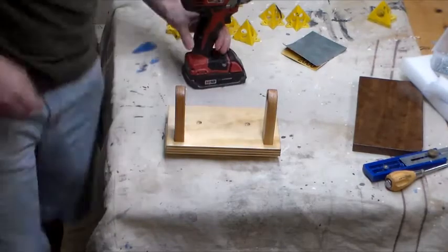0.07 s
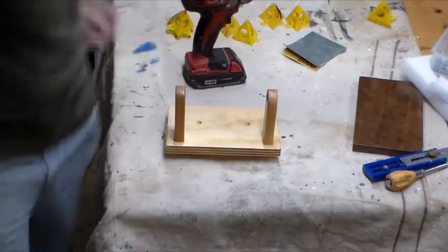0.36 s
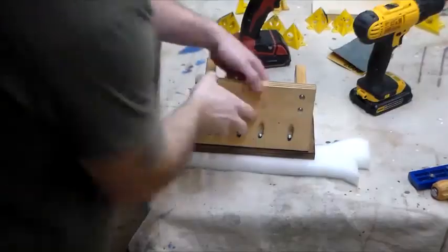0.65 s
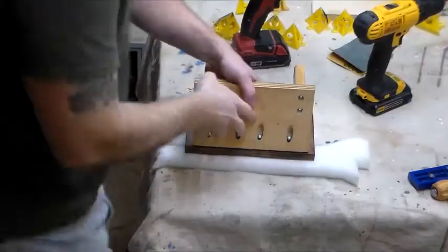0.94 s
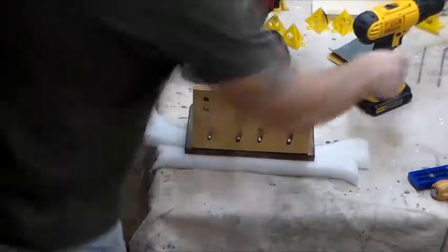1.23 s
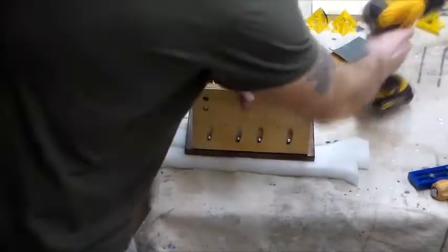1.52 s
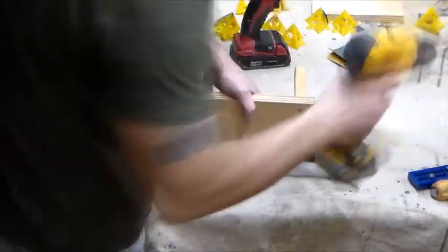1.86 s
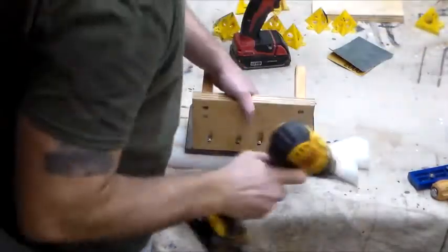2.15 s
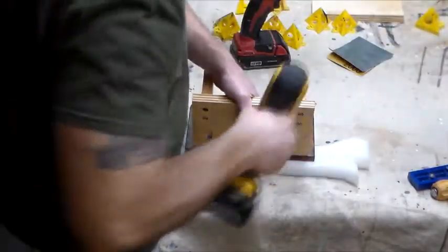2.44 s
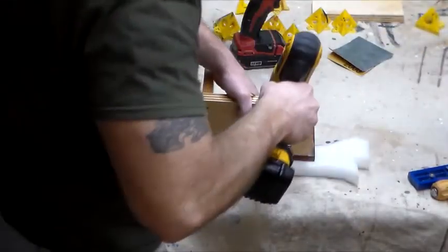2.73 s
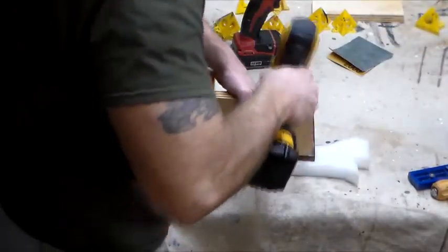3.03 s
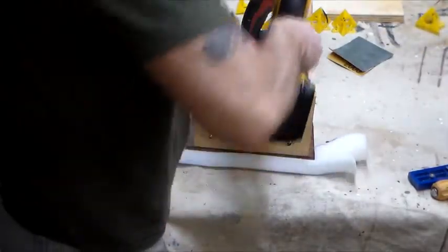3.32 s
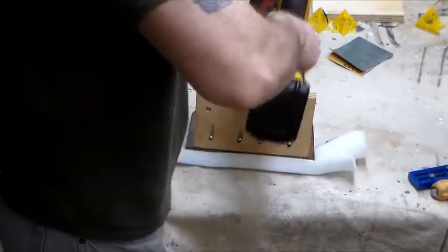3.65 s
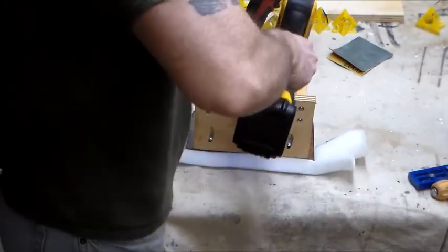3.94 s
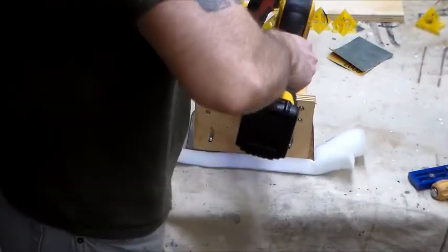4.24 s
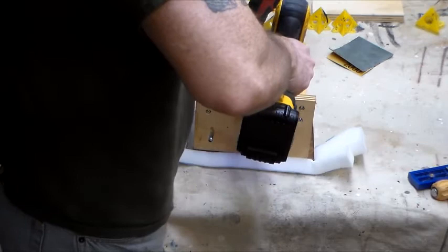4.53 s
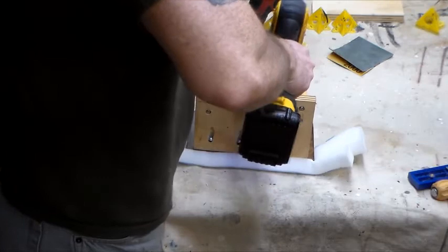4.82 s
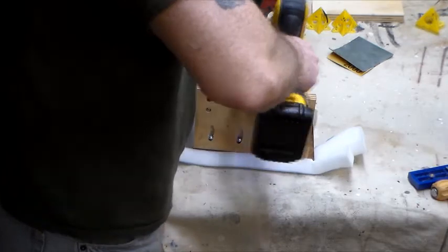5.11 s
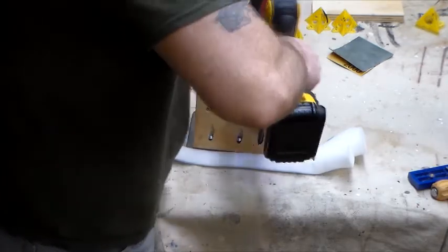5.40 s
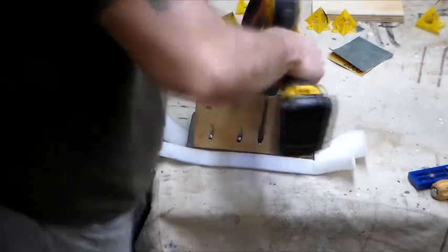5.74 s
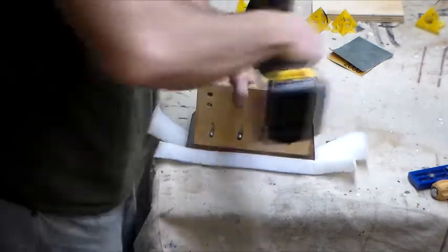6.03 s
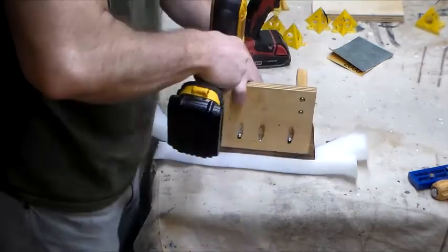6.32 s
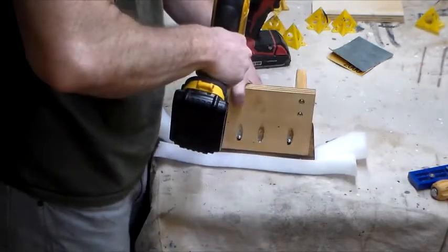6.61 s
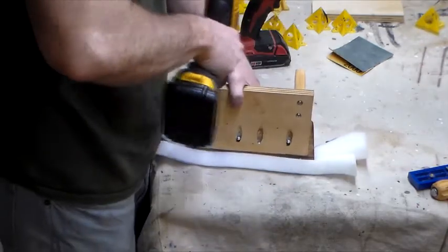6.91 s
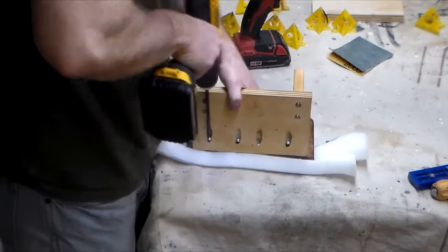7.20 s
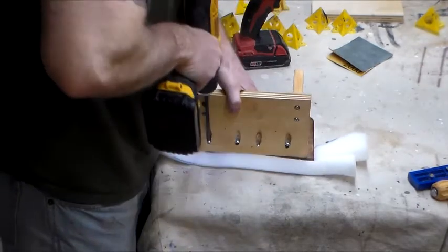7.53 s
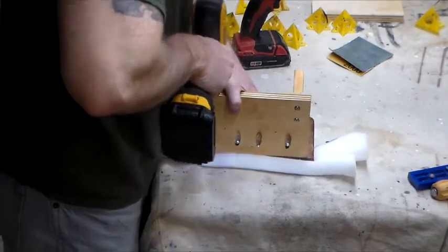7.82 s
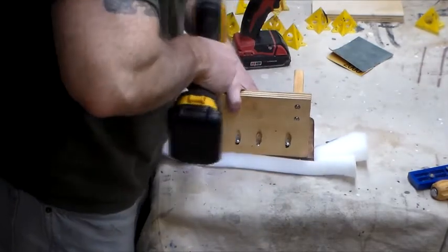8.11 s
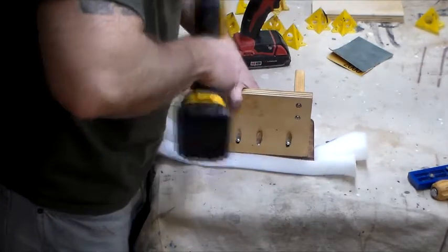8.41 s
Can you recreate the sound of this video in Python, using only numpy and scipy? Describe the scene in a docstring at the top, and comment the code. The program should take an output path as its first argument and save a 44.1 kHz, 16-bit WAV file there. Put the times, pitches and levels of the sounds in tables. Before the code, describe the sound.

A cordless drill drives screws into wood in short growling bursts, after a few thumps and clicks on a workbench.

```python
"""A low room rumble is heard first, with wood sliding and thumping on a cloth-covered workshop bench.
A nearby camera's lens ticks and whirs faintly, and a steel bit is seated in a screw with a few clacks.
A cordless drill then drives screws into a wooden jig in ten short trigger pulls: gears and friction
force the housing and jig to growl and grind, the chuck rattles, fan and brushes hiss, and the screw
squeals by stick-slip. The small room adds a short reverberation."""
import sys
import numpy as np
from scipy import signal
from scipy.fft import rfft, irfft
from scipy.io import wavfile
from scipy.ndimage import uniform_filter1d

SR = 44100
rng = np.random.default_rng(int(sys.argv[2]) if len(sys.argv) > 2 else 0)


def int16_out(signal):
    """Quantize to a 16-bit WAV file."""
    q = np.round(np.clip(np.atleast_2d(signal).T, -1, 1) * 32767)
    wavfile.write(sys.argv[1], SR, q.astype(np.int16))


N = 373086
TIME = np.arange(N) / SR

# Levels are relative within each table; a decay time is that of a 60 dB fall.
# workshop rumble and hiss: (frequency [Hz], level [dB])
AMBIENT_SPECTRUM = [(20, 1.5), (50, 2.5), (80, -1), (130, -10), (250, -9), (420, -17.5), (800, -22),
                    (1500, -26.5), (3500, -29.5), (7000, -31.5), (11000, -32), (14000, -36.5)]
# its course, which sinks around the loud pulls: (time [s], level [dB])
AMBIENT_LEVEL = [(.27, -67.5), (.4, -62), (4.38, -63.5), (4.56, -76), (4.75, -72.5), (5.25, -71),
                 (5.55, -66.5), (5.73, -66.5), (5.82, -79.5), (6.17, -79), (6.24, -69.5), (7.0, -66.5),
                 (7.66, -67.5), (7.73, -75.5), (8.46, -70.5)]
# hands, cloth and wood slide: (time [s], level [dB], rise [s], decay time [s], tilt [dB/octave])
SCUFFS = [(0.049, -54.5, .027, 0.12, -2), (.31, -65.5, .01, .42, -0.5), (.488, -68, 0.0038, 0.16, -2),
          (.576, -56, 0.0037, 0.47, -0.5), (0.632, -55, .0022, .33, -5.5), (.743, -59, 0.0017, 0.5, 0.5),
          (1.005, -50, .008, 0.12, -4.5), (3.237, -56.5, 0.012, 0.13, 1), (3.305, -61, 0.0011, 0.084, -1),
          (5.545, -59, .0053, 0.3, 0), (6.909, -59.5, 0.00084, 0.12, 2), (6.943, -61, .0014, 0.38, -3.5),
          (7.033, -62, 0.0014, 0.15, 0.5)]
# sliding friction: (frequency [Hz], level [dB])
SCUFF_SPECTRUM = [(100, -54), (300, -8.5), (1000, -11.5), (2200, -7.5), (3600, -9.5), (6000, -10.5),
                  (14000, -24)]
# wood is set down or pressed on the bench: (time [s], level [dB], pitch [ratio])
THUMPS = [(.349, -49.5, 0.6), (0.363, -57.5, 1.33), (.633, -44, 0.98), (.644, -34, 0.9),
          (0.693, -42.5, 0.63), (.713, -49, 1.1), (1.01, -54.5, 1.2), (3.958, -49, 0.615),
          (3.964, -53.5, 2.42), (4.444, -55, 1.22), (4.801, -56.5, .62), (4.884, -62, 0.46),
          (5.551, -60, .87)]
# padded bench: (nominal frequency [Hz], level [dB], decay time [s])
BENCH_MODES = [(90.4, -14, 0.077), (176, 2, 0.032), (347, -10.5, 0.044)]
# the lens mechanism ticks: (time [s], level [dB])
TICKS = [(.444, -46.5), (1.164, -44), (1.346, -50.5), (1.533, -41), (1.671, -47.5), (1.847, -45),
         (2.106, -53), (2.2781, -41.5), (2.4227, -46.5), (3.162, -44.5)]
# camera body: (nominal frequency [Hz], level [dB], nominal decay time [s])
CAMERA_MODES = [(1070, -14, 0.025), (2290, -0.5, 0.018), (2970, 4, 0.0092), (3686, 0.5, 0.02),
                (4400, -1.5, 0.013), (4820, -8.5, 0.02), (5700, -8.5, 0.018), (6440, -10, 0.028),
                (7160, 1, 0.0067)]
# wood or bit rubs with a hollow rasp: (start [s], end [s], level [dB], resonance [Hz])
SCRAPES = [(0.485, 0.51, -62, 1890), (6.755, 7.194, -82.5, 2450)]
# the focus motor runs: (start [s], end [s], level [dB])
WHIRS = [(1.34, 1.47, -78), (1.67, 1.77, -75), (2.1, 2.23, -77.5), (2.43, 2.78, -77), (2.94, 3.13, -80),
         (6.27, 7.2, -83.5)]
# its resonances: (frequency [Hz], width [Hz], level [dB])
FOCUS_PEAKS = [(2410, 220, 2.5), (3600, 180, 5.5), (4800, 150, -6), (7070, 200, -10)]
# the bit seats or jumps in the screw head:
# (time [s], level [dB], ring length [ratio], tilt [dB/octave], rebound [dB])
CLACKS = [(2.781, -35, 0.86, -1.5, -1), (2.8448, -44, 1.5, 0.5, -8.5), (3.252, -49, .25, 12, -3),
          (3.891, -47.5, 0.72, -1, -8), (4.441, -34.5, 0.37, 2.5, -3), (4.467, -38.5, 0.23, 11, -16),
          (5.028, -36, 0.43, 4, -17), (5.055, -40, 1.1, 6, -16), (5.751, -38.5, 0.47, 12.5, -9),
          (6.627, -47.5, 0.84, 0, -33), (6.723, -51, 0.38, 0, -23), (6.949, -43.5, 0.5, -3, -14),
          (7.235, -50, .55, 1, -4), (8.023, -42.5, 0.43, -7, -18)]
# contact noise of a clack: (frequency [Hz], level [dB])
CRACK_SPECTRUM = [(200, -25), (500, -10.5), (800, 9), (1200, -0.5), (1900, 3), (2400, -3.5), (3100, -2),
                  (3550, -5.5), (4000, -23.5), (4650, -3), (5200, -3.5), (6000, -13), (9000, -15),
                  (14000, -27)]
# screw and board: (frequency [Hz], level [dB], nominal decay time [s])
JIG_MODES = [(706, -19, 0.36), (744, -9, 0.1), (904, -7, 0.066), (1004, 2, .12), (1387, 1, 0.045),
             (1550, -7.5, 0.088), (1830, -14.5, 0.12), (1910, -4, 0.056), (2060, -7, 0.04),
             (2440, -16.5, 0.21), (2970, -19, .088), (3505, 5.5, 0.016), (3010, -2, 0.031),
             (4440, -10.5, 0.073), (5320, -20.5, .1)]
# trigger pulls: (start [s], bite [s], hold [s], swell [s], spin-up [s], top speed [turns/s],
# sag [turns/s^2], step on release [dB], fade [dB/s], grinding [dB], rattle [dB], hiss [dB],
# gear tone over grinding [dB], vent weight in the hiss [0-1], trigger click [dB], bite snap [dB])
PULLS = [ (3.879, 3.88, 0.17, 0.06, 0.12, 218, 180, 2.5, 375, -49.5, -56.5, -52, -1, 0.38, -87, -58),
         (4.274, 4.449, 0.19, 0.044, 0.11, 300, 32, -8.5, 349, -45, -57.5, -45.5, -1.5, 0.51, -70, -52),
         (4.759, 4.772, 0.16, 0.024, .092, 308, 520, -3.5, 167, -43.5, -51, -46, 6, 0.14, -49, -54),
         (5.026, 5.025, .127, 0.0061, 0.037, 315, 423, -0.5, 180, -45, -47.5, -47, -1, 0, -44, -35),
         (5.289, 5.302, 0.15, 0.01, 0.066, 287, 140, -2, 220, -45.5, -45.5, -47.5, 2, 0.1, -45, -53.5),
         (5.714, 5.7377, 0.14, 0.042, .07, 270, 250, 0, 330, -46, -52.5, -47, 2.5, .08, -59, -30.5),
         (7.202, 7.246, .158, 0.039, 0.11, 260, 97.7, -1, 333, -53, -53.5, -53.5, -11, 0.18, -57, -34.5),
         (7.547, 7.681, .375, 0.037, .145, 338, 390, -6, 170, -44, -53, -47, 9.5, 0.18, -76, -34.5),
         (8.0, 8.023, 0.14, 0.029, 0.11, 297, 60, 0, 220, -44, -48.5, -46, 5, 0.04, -54, -38),
         (8.284, 8.301, 0.11, .028, 0.07, 275, 42, 0.5, 216, -41.5, -48, -46, 0, 0.17, -49, -35), ]
# trigger click and bite snap: (frequency [Hz], level [dB])
SNAP_SPECTRUM = [(300, -25.5), (1200, 5), (4500, -1), (9000, 1), (14000, -9.5)]
# gear tones: (order [multiple of motor speed], level [dB])
GEAR_ORDERS = [(.42, -1), (.5, -6), (1, 13), (1.5, -12.5), (2, -0.5), (2.5, -2.5), (3, 2.5), (3.5, -3.5),
               (4, 3.5), (4.5, -2), (5, 0.5), (6, -5.5), (7, -3.5), (8, -4.5), (9, -8)]
# response of housing and jig together: (frequency [Hz], level [dB])
BODY_SPECTRUM = [(60, -43), (130, -13), (210, -24.5), (300, -21.5), (430, -7.5), (750, -2.5), (1050, -8),
                 (1400, 5), (1700, 2.5), (2150, 2.5), (2700, 2.5), (3500, -10.5), (4600, -5), (14000, -47)]
# their resonances: (frequency [Hz], width [Hz], boost [dB])
BODY_PEAKS = [(610, 110, 0.5), (954, 36, 10.5), (1057, 26, 10.5), (1129, 160, 7), (1265, 55, 4),
              (1465, 5.3, 2), (1510, 44, 0.5), (1860, 35, 1.5), (2080, 33, 0.5), (2380, 40, 2)]
# response of bit and chuck: (frequency [Hz], level [dB])
CHUCK_SPECTRUM = [(1000, -40), (2400, -3.5), (2900, -9.5), (3400, 3.5), (4100, -7), (4700, -8.5),
                  (5600, -10), (14000, -49.5)]
# their resonances: (frequency [Hz], width [Hz], boost [dB])
CHUCK_PEAKS = [(3090, 56, 10.5), (3350, 45, 7.5), (3650, 97, 3), (4030, 230, 12.5), (4630, 130, 5.5)]
# fan air and brushes: (frequency [Hz], level [dB])
HISS_SPECTRUM = [(500, -15.5), (1500, -8.5), (2500, -3), (3600, -0.5), (5000, -1), (6100, -4), (6750, 0),
                 (8500, -2.5), (10000, -5.5), (11000, -6), (14000, -12)]
# air singing in the vents: (frequency [Hz], level [dB])
VENT_SPECTRUM = [(6000, -41.5), (8000, -15), (9200, -7.5), (10000, -4), (10700, -28), (12000, -12.5),
                 (14000, -19.5)]
# the speed control whines with the trigger part way in: (start [s], end [s], level [dB])
WHINES = [(3.893, 4.018, -56), (4.269, 4.316, -64.5), (7.197, 7.24, -69), (7.525, 7.59, -68)]
# the screw squeals: (start [s], end [s], first pitch [Hz], last pitch [Hz], level [dB], jitter [ratio])
SQUEALS = [(4.338, 4.407, 3420, 3130, -45, 0.016), (4.442, 4.482, 1890, 1747, -40.5, 0.15),
           (5.755, 5.84, 3270, 3385, -45, 0.061), (7.228, 7.262, 1870, 1880, -46, 0.071),
           (7.587, 7.622, 2537, 2820, -52, 0.036), (7.629, 7.696, 3440, 3830, -41.5, 0.0076)]
# workshop reverberation: (frequency [Hz], decay time [s])
ROOM_DECAY = [(150, 0.14), (1000, 0.19), (4000, 0.2), (12000, 0.18)]
# likeness of left and right: (frequency [Hz], coherence [0-1])
COHERENCE = [(100, 0.93), (1000, 0.87), (2000, 0.84), (4000, 0.62), (8000, 0.22), (13000, 0.27)]
# stereo balance: (frequency [Hz], right minus left [dB])
BALANCE = [(100, -0.3), (700, -0.6), (2000, 0.76), (4000, 1.1), (8000, 0), (13000, 1.5)]


def amp(db):
    """Amplitude ratio of a level in decibels."""
    return 10 ** (np.asarray(db) / 20)


def unit_rms(x):
    """Normalisation to unit mean power."""
    return x / np.sqrt(np.mean(x ** 2) + 1e-20)


def at_frequency(points, hz):
    """Interpolation on a logarithmic frequency axis."""
    f, value = np.transpose(points)
    return np.interp(np.log(hz + 1), np.log(f + 1), value)


def add(mix, s, sound):
    """Superposition of a sound on the mix, from time s."""
    part = mix[:, max(round(s * SR), 0):][:, :sound.shape[-1]]
    part += sound[..., :part.shape[1]]


def bins(x):
    """Fourier frequencies of a signal, in Hz."""
    return np.fft.rfftfreq(x.shape[-1], 1 / SR)


def resonance(hz, centre, width):
    """Lorentzian peak of unit height."""
    return 1 / (1 + (2 * (hz - centre) / width) ** 2)


def colour(x, spectrum, tilt_db=0, peaks=()):
    """Source-filter shaping by a spectrum, a tilt per octave and resonances, at unit rms."""
    hz = bins(x)
    db = at_frequency(spectrum, hz) + tilt_db * np.log2(np.maximum(hz, 200) / 2000)
    db += sum(boost * resonance(hz, f, width) for f, width, boost in peaks)
    return unit_rms(irfft(rfft(x) * amp(db), x.shape[-1]))


def spread(pair):
    """Partial coherence: two independent signals become alike in the bass, diffuse in the treble."""
    coherence = np.clip(at_frequency(COHERENCE, bins(pair)), 0, 1)
    mid, side = rfft(pair) * np.sqrt([(1 + coherence) / 2, (1 - coherence) / 2])
    return irfft(np.array([mid + side, mid - side]), pair.shape[-1])


def noise(size):
    """Partly coherent stereo white noise."""
    return spread(rng.standard_normal((2, size)))


def wander(hz):
    """Random modulation of unit rms, low-passed at hz."""
    return unit_rms(irfft(rfft(rng.standard_normal(N)) / (1 + (bins(TIME) / hz) ** 4), N))


def grains(per_s, spread_db):
    """Shot noise: a Poisson train of tiny impulses of uneven size."""
    size = amp(spread_db * np.minimum(rng.exponential(1, N), 4))
    struck = rng.random(N) < per_s / SR
    return unit_rms(spread(size * struck * rng.choice([-1., 1.], (2, N))))


def gate(rows, edge_s):
    """Soft-edged envelope, open during each (start, end, level) row."""
    steps = sum(amp(db) * ((TIME > start) & (TIME < end)) for start, end, db in rows)
    return uniform_filter1d(steps, round(edge_s * SR))


def room_rumble(waver_db=1):
    """Ambient noise, with its power density greatest in the bass."""
    level_db = np.interp(TIME, *np.transpose(AMBIENT_LEVEL))
    return colour(noise(N), AMBIENT_SPECTRUM) * amp(level_db + waver_db * wander(11))


def scuffs():
    """Sliding friction radiates short bursts of broadband noise."""
    out, t = np.zeros((2, N)), np.arange(SR // 2) / SR
    for s, db, rise, t60, tilt_db in SCUFFS:
        envelope = np.minimum(t / rise, 1) * amp(db - 60 * t / t60)
        add(out, s, colour(noise(len(t)), SCUFF_SPECTRUM, tilt_db) * envelope)
    return out


def bench_thumps(rise_s=.0031, gain_db=11):
    """A cushioned impact of wood excites the low, heavily damped modes of the bench."""
    out, t = np.zeros((2, N)), np.arange(SR // 2) / SR
    for s, db, pitch in THUMPS:
        ring = sum(amp(level - 60 * t / t60) * np.sin(2 * np.pi * hz * pitch * t)
                   for hz, level, t60 in BENCH_MODES)
        add(out, s, amp(db + gain_db) * (1 - np.exp(-t / rise_s)) * ring)
    return out


def lens_ticks(gain_db=-4, detune=.04, damping=1.12, rise_s=.0009):
    """Each tick sets the camera body in free vibration, its modes slightly detuned at random."""
    out, t = np.zeros((2, N)), np.arange(SR // 25) / SR
    onset = 1 - np.exp(-t / rise_s)
    for s, db in TICKS:
        for hz, level, t60 in CAMERA_MODES:
            mode_hz = hz * (1 + detune * rng.uniform(-1.1, 1))
            envelope = onset * amp(db + gain_db + level - 60 * damping * t / t60)
            add(out, s, envelope * np.sin(2 * np.pi * (mode_hz * t + rng.random())))
    return out


def scrapes(width_hz=530, uneven_db=3):
    """Friction noise filtered by a single resonance gives a hollow rasp."""
    out = np.zeros((2, N))
    for start, end, db, hz in SCRAPES:
        rasp = unit_rms(irfft(rfft(noise(N)) * resonance(bins(TIME), hz, width_hz), N))
        out += rasp * gate([(start, end, db)], edge_s=.016)
    return out * amp(uneven_db * wander(30))


def focus_whir(depth_db=6):
    """The focus motor whirs in fits: narrow bands of noise under random amplitude modulation."""
    hz = bins(TIME)
    response = sum(amp(db) * resonance(hz, f, width) for f, width, db in FOCUS_PEAKS)
    fits = amp(depth_db * np.tanh(2 * wander(30)))
    return unit_rms(irfft(rfft(noise(N)) * response, N) * fits) * gate(WHIRS, edge_s=.02)


def bit_clacks(ring_db=-10, crack_db=-7, uneven_db=2.5, crack_s=.095, rebound_s=.011):
    """Steel strikes the screw head and rebounds once; each impact cracks and rings the jig's modes."""
    out, t = np.zeros((2, N)), np.arange(SR // 4) / SR
    for s, db, length, tilt_db, rebound_db in CLACKS:
        for at, blow_db in (s, db), (s + rebound_s, db + rebound_db):
            blow = colour(noise(len(t)), CRACK_SPECTRUM, tilt_db)
            blow *= amp(crack_db - 60 * t / (crack_s * length))
            for hz, level, t60 in JIG_MODES:
                # each blow lands a little differently and favours other modes
                mode_db = level - uneven_db * rng.standard_normal() + tilt_db * np.log2(hz / 2000)
                envelope = amp(ring_db + mode_db - 60 * t / (t60 * length))
                blow += envelope * np.sin(2 * np.pi * (hz * t + rng.random()))
            add(out, at, amp(blow_db) * blow)
    return out


def snaps(click_t60=.02, snap_t60=.014):
    """Broadband transients: the trigger clicks, and the gear backlash closes as the screw bites."""
    out, t = np.zeros((2, N)), np.arange(SR // 20) / SR
    for start, bite, *_, click_db, snap_db in PULLS:
        add(out, start, colour(noise(len(t)), SNAP_SPECTRUM) * amp(click_db - 60 * t / click_t60))
        add(out, bite, colour(noise(len(t)), SNAP_SPECTRUM) * amp(snap_db - 60 * t / snap_t60))
    return out


def motor_drive(kick=.68, coast_s=.2, bite_s=.018, unload_s=.0048, swell_db=-15, droop_db=-4):
    """Speed and source envelopes: the motor spins up, sags under load and coasts by inertia."""
    pulls = np.array(PULLS)
    latest = np.maximum(np.searchsorted(pulls[:, 0], TIME) - 1, 0)
    (start, bite, held, swell, spin_up, top, sag, step_db, fade,
     grind_db, rattle_db, hiss_db, tone_db, vent_weight) = pulls.T[:-2, latest]
    t = np.maximum(TIME - start, 0)
    coasting = np.maximum(t - held, 0)
    spin = 1 - (1 - kick) * np.maximum(1 - t / spin_up, 0) ** 2  # share of top speed
    speed = (top * spin - sag * np.maximum(t - coasting - spin_up, 0)) * np.exp(-coasting / coast_s)
    effort_db = swell_db * np.maximum(1 - t / swell, 0) + droop_db * np.minimum(t / held, 1)
    effort = (TIME > start) * amp(effort_db)
    slack = 1 - np.clip((TIME - bite) / bite_s, 0, 1)  # 1 until the screw bites
    release_db = step_db * np.minimum(coasting / unload_s, 1) - fade * coasting
    load = effort * amp(grind_db - 5.5 * slack + release_db)
    rattle = effort * amp(rattle_db + release_db)
    # the hiss gains 19 dB per doubling of spin and fades faster than the gears
    hiss = effort * amp(hiss_db + 19 * np.log2(spin) + 1.45 * release_db)
    # the gear tone sinks into the grinding by 30 dB per halving of speed
    tone = amp(tone_db - 9.5 * slack + 30 * np.log2(speed / top))
    return speed, load, rattle, hiss, tone, vent_weight


def drill(jitter=.009, flutter_db=4, throb=.027, grit=.72, chatter_db=.58, lurch_db=1.44):
    """Forced vibration: gears and friction drive housing and jig; the chuck rattles, the fan hisses."""
    speed, load, rattle, hiss, tone, vent_weight = motor_drive()
    angle = 2 * np.pi * np.cumsum(speed * (1 + jitter * wander(160))) / SR
    # tooth contact is uneven, so each order flutters on its own
    gears = sum(amp(db + flutter_db * wander(50)) * np.cos(k * angle + 2 * np.pi * rng.random())
                for k, db in GEAR_ORDERS)
    # friction surges once every second motor turn
    surge = (1 + throb * np.cos(angle / 2)) * amp(chatter_db * wander(80))
    friction = surge * (noise(N) + grit * grains(per_s=1500, spread_db=4.5))
    grind = colour(friction, BODY_SPECTRUM, peaks=BODY_PEAKS)
    growl = colour(gears, BODY_SPECTRUM, peaks=BODY_PEAKS)
    growl /= np.sqrt(np.average(growl ** 2, weights=load ** 2))  # unit rms under load
    body = (grind + tone * growl) / np.sqrt(1 + tone ** 2)
    chuck = colour(surge * grains(per_s=2200, spread_db=-1), CHUCK_SPECTRUM, peaks=CHUCK_PEAKS)
    brushes = colour(surge * (noise(N) + grit * grains(per_s=2500, spread_db=5.5)), HISS_SPECTRUM)
    vents = colour(noise(N), VENT_SPECTRUM)
    air = np.sqrt(1 - vent_weight) * brushes + np.sqrt(vent_weight / 2) * vents
    lurch = amp(lurch_db * wander(21))  # the screw meets harder and softer wood
    return lurch * (amp(1) * load * body + rattle * chuck) + amp(4.5) * hiss * air


def control_whine(switch_hz=3925, second_db=-16, third_db=-18, waver_db=2):
    """Chopped motor current sounds at the switching frequency and its harmonics."""
    angle = 2 * np.pi * switch_hz * TIME
    tone = np.sin(angle) + amp(second_db) * np.sin(2 * angle) + amp(third_db) * np.sin(3 * angle)
    return unit_rms(tone) * gate(WHINES, edge_s=.015) * amp(waver_db * wander(40))


def screw_squeals():
    """Stick-slip oscillation of steel in the tight hole gives short, unsteady gliding tones."""
    out, slips = np.zeros((2, N)), wander(300)
    for start, end, from_hz, to_hz, db, jitter in SQUEALS:
        size = round((end - start) * SR)
        hz = np.linspace(from_hz, to_hz, size) * (1 + jitter * slips[round(start * SR):][:size])
        envelope = amp(db) * np.sin(np.linspace(0, np.pi, size))
        add(out, start, envelope * np.sin(2 * np.pi * np.cumsum(hz) / SR))
    return out


def reverberation(x, gap_s=.004):
    """The diffuse field of a small, damped room decays exponentially, each band at its own rate."""
    hz, t, bands = signal.stft(noise(SR // 2), SR, nperseg=256)
    decay = amp(-60 * t / at_frequency(ROOM_DECAY, hz)[:, None]) * (t > gap_s)
    tail = signal.istft(bands * decay, SR, nperseg=256)[1]
    return signal.fftconvolve(x, tail / np.linalg.norm(tail[0]), axes=1)[:, :N]


def scene():
    """Superposition of all direct sound and the reverberation of the tool and the handling."""
    tool = drill() + control_whine() + screw_squeals() + snaps()
    handling = bit_clacks() + scuffs() + bench_thumps() + scrapes()
    room = reverberation(amp(-11.5) * tool + amp(-7) * handling)
    return tool + handling + room + lens_ticks() + focus_whir() + room_rumble()


def record(dry, cutoff_hz=14350):
    """Linear filtering: the right channel is a little brighter, and a low-pass limits the band."""
    lean_db = at_frequency(BALANCE, bins(dry)) / 2
    heard = irfft(rfft(dry) * amp([-lean_db, lean_db]), N)
    low_pass = signal.firwin(511, cutoff_hz, window=("kaiser", 9), fs=SR)
    return signal.oaconvolve(heard, low_pass[None], "same")


dry = scene()
out = record(dry)
int16_out(out)
```